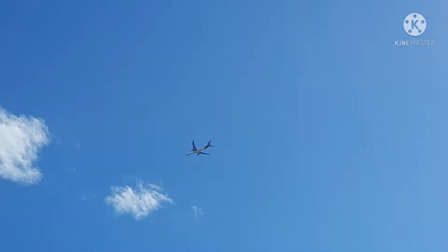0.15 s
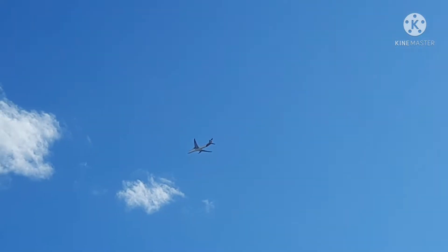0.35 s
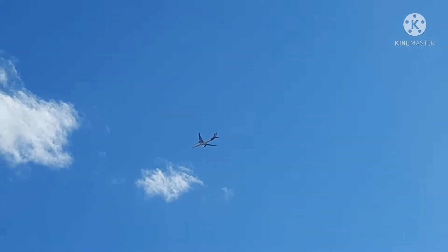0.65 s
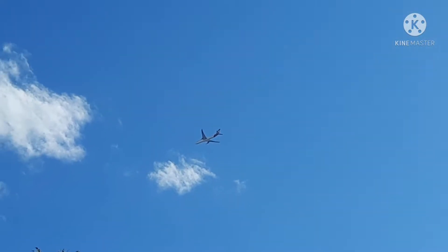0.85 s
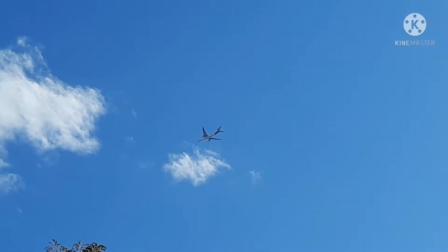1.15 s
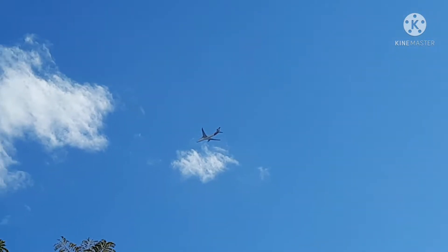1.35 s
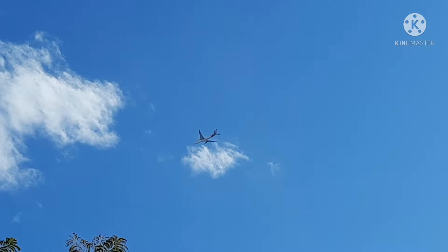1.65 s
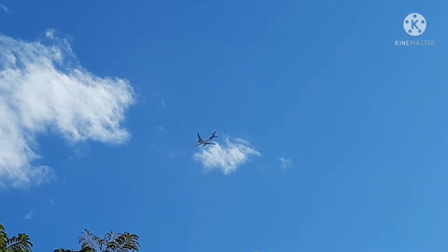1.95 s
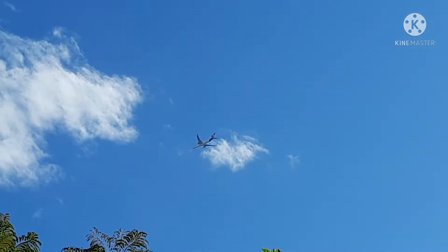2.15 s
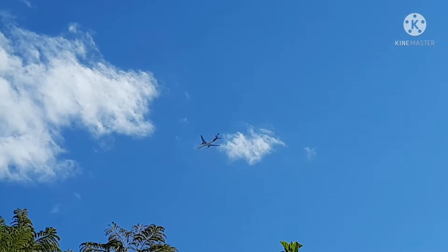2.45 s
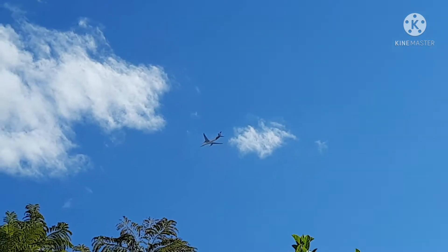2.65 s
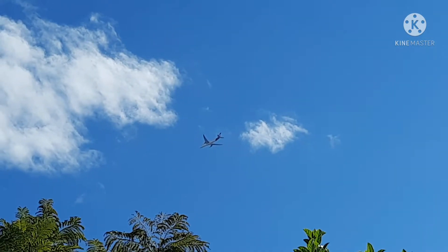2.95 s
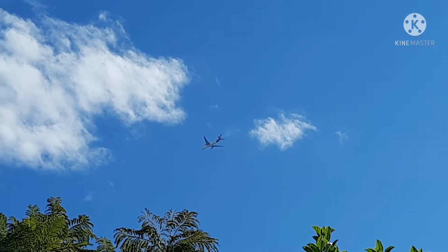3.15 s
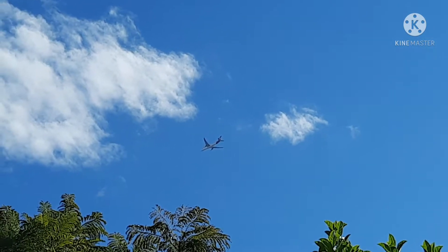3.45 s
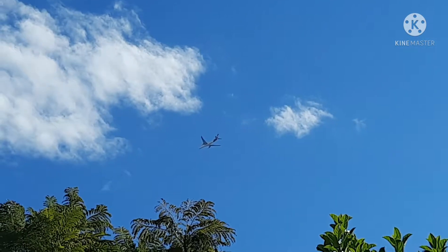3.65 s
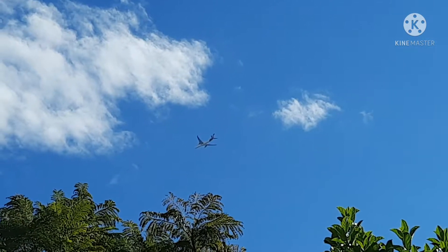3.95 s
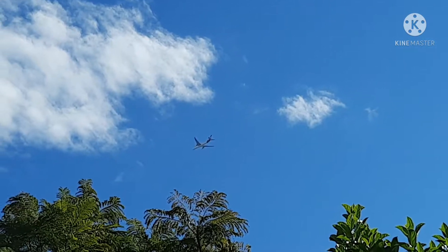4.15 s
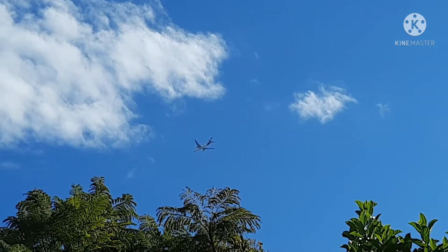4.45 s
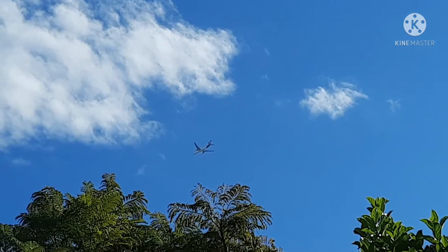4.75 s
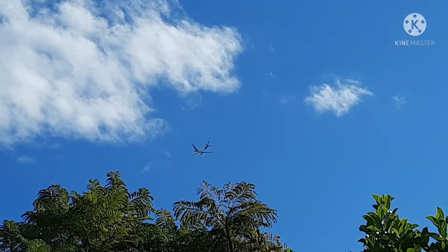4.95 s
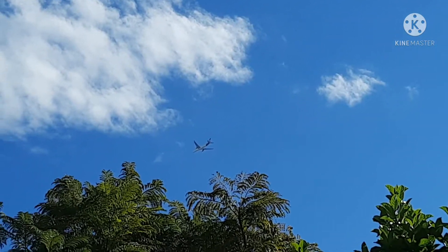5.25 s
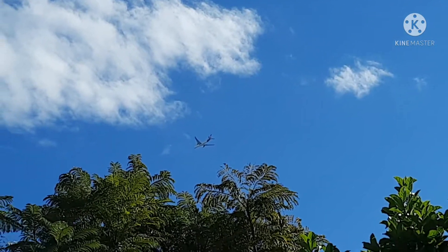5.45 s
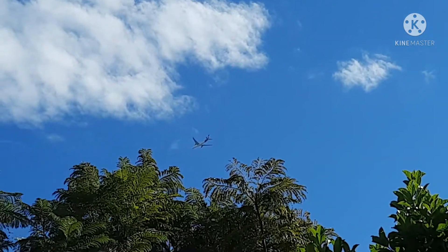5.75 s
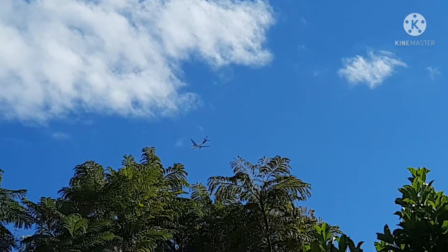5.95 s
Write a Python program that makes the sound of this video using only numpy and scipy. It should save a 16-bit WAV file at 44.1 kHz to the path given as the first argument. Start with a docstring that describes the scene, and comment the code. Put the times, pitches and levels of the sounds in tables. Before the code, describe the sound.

A jet airliner climbs away overhead with a loud, low, uneven roar and a wavering, slowly sinking whine, over barely audible bird calls.

```python
"""A jet airliner climbs away high over a garden, heard on a two-port phone. From the start its mixing exhaust roars,
dulled by the long air path, uneven and flickering in level, and echoed by ground and walls. Over it the fan whine,
a wavering tone, sinks in pitch, with a weaker drone below. From 1.5 s small birds call from the trees: a soft whistle,
two high chirps, another whistle and at 6 s a last chirp, all gliding tones smeared by the trees. Faint hiss lies below."""
import sys
import numpy as np
from scipy import signal
from scipy.fft import rfft, irfft, next_fast_len
from scipy.io import wavfile
from scipy.ndimage import uniform_filter1d

SR = 44100
rng = np.random.default_rng(int(sys.argv[2]) if len(sys.argv) > 2 else 0)


def master_out(mix):
    """Clip the mix to full scale and print it as 16-bit PCM to the path in sys.argv[1]."""
    frames = np.transpose(np.atleast_2d(mix))
    ceiling = np.clip(frames, -1, 1)
    pcm = np.round(ceiling * 32767).astype(np.int16)
    wavfile.write(sys.argv[1], SR, pcm)


N = 269539
SIZE = next_fast_len(N)  # transform length in samples


def undb(db):
    """Decibel definition: amplitude ratio = 10 ** (dB / 20)."""
    return 10 ** (np.asarray(db) / 20)


def level(x, db):
    """Root-mean-square scaling: set the effective level in dB re full scale."""
    return x * undb(db) / np.sqrt(np.mean(x ** 2))


def curve(rows):
    """Linear interpolation in time: the columns of (s, ..) rows at every sample."""
    seconds, *columns = np.transpose(rows)
    return [np.interp(np.arange(N) / SR, seconds, column) for column in columns]


def over(hz, rows):
    """Interpolation on a logarithmic frequency axis: the columns of (Hz, ..) rows at hz."""
    at, *columns = np.transpose(rows)
    return [np.interp(np.log(hz + 1), np.log(at), column) for column in columns]


def walk(rate):
    """Smoothed random process: levels held 1 / rate s, averaged twice over that time; standard deviation 1."""
    hold = int(SR / rate)
    steps = np.repeat(rng.standard_normal(900), hold)[:N]
    smooth = uniform_filter1d(uniform_filter1d(steps, hold), hold)
    return smooth / np.std(smooth)


def tone(hz):
    """Phase as the integral of frequency: a sine of effective value 1 at a changing pitch."""
    return np.sqrt(2) * np.sin(2 * np.pi * np.cumsum(hz) / SR)


def ports(hz):
    """Level and phase differences between receivers: complex gain of each port, power share both hear alike."""
    # Each row: frequency in Hz, left minus right in dB, lead of the right port in radians, likeness 0-1.
    port_rows = [(60, .1, 0, .995), (200, .4, 0, .98), (400, 1, .06, .94), (600, 2.3, .16, .92),
                 (800, 2.9, .59, .74), (1000, 1.4, .37, .61), (1150, 6.1, .6, .62), (1300, 4.2, 1.85, .76),
                 (1550, 1.9, 1.47, .82), (1850, .6, 2.11, .82), (2100, -2.8, 2.24, .6),
                 (2350, -7, 1.95, .46), (2550, -7.6, 1.12, .55), (2800, -1.1, 1.44, .37)]
    tilt_db, lead, alike = over(hz, port_rows)
    left = undb(tilt_db / 2) * np.exp(-.5j * lead)
    return np.array([left, 1 / left]), np.clip(alike, 0, 1)


def roar(hz):
    """Broadband turbulent mixing noise, comb-filtered by echoes, in third-octave bands of uneven level."""
    # Exhaust spectrum. Each row: frequency in Hz, relative density in dB per Hz.
    spectrum = [(20, -49.5), (39, -31.5), (52, -14.5), (66, -2), (130, -2.5), (330, -2.5), (480, -2),
                (740, -11.5), (830, -14.5), (1050, -20.5), (1330, -24.5), (1540, -25), (1800, -28),
                (1950, -33), (2100, -39), (2650, -55.5), (2850, -65.5), (3600, -82.5)]
    # Ground and wall echoes. Each row: delay in seconds, signed gain at the lowest frequencies.
    echo_rows = [(0.00471, -0.08), (0.00665, 0.25), (0.00774, -0.14), (0.00919, 0.06), (0.01046, -0.11),
                 (0.0123, 0.15), (0.01335, -0.14), (0.01535, 0.11), (0.01689, -0.12), (0.01812, -0.15),
                 (0.02017, 0.09), (0.02168, 0.09), (0.02543, -0.07), (0.0293, -0.07), (0.03016, 0.07)]
    # Uneven level of the roar in each range, slow swells together with the random flicker of noise.
    # Each row: time in seconds, level in dB; only departures from the mean count.
    rumble = [(0.08, -16.5), (0.88, -26.5), (1.38, -25), (1.82, -25), (2.56, -22.5), (2.84, -24),
              (3.3, -21.5), (3.56, -26), (3.8, -20.5), (4.38, -22), (4.56, -20), (4.78, -23.5),
              (5.08, -19.5), (5.52, -24), (5.76, -19.5), (6.04, -18.5)]  # 90-220 Hz
    body = [(0.08, -27.5), (.4, -28.5), (0.711, -23.5), (.95, -30.5), (1.14, -20.5), (1.36, -29),
            (1.7, -27), (2.4, -30.5), (2.75, -25), (2.95, -20.5), (3.151, -27), (3.3, -23), (3.65, -31),
            (3.85, -28.5), (4.4, -29.5), (4.6, -24.5), (5.0, -28), (5.15, -24.5), (5.6, -27), (6.04, -24.5)]  # 220-290 Hz
    low = [(0.05, -16.5), (0.15, -25), (0.2, -24.5), (0.28, -18.5), (0.42, -27), (0.47, -18.5), (1.17, -26),
           (1.62, -27), (1.64, -19), (1.86, -23.5), (1.89, -17.5), (2.13, -23), (2.23, -22), (2.26, -30.5),
           (2.41, -17.5), (2.45, -26.5), (2.77, -21), (2.82, -25.5), (2.88, -17.5), (3.0, -24.5),
           (3.35, -18), (3.5, -29), (3.52, -20.5), (3.62, -22), (4.16, -17.5), (4.17, -21), (4.69, -22.5),
           (4.71, -16), (4.74, -26), (5.21, -25.5), (5.25, -16.5), (5.28, -23.5), (5.77, -26), (5.8, -19.5),
           (6.04, -25), (6.07, -22.5)]  # 290-420 Hz
    middle = [(0.05, -27.5), (0.38, -20.5), (0.47, -23), (0.5, -18.5), (0.57, -15.5), (0.6, -23.5),
              (0.64, -16.5), (0.77, -27.5), (1.22, -26.5), (1.24, -22), (1.46, -27.5), (1.47, -22.5),
              (1.54, -28.5), (1.64, -21), (2.26, -24.5), (2.88, -21), (2.93, -23.5), (3.1, -24),
              (3.15, -18), (3.22, -25), (3.25, -17.5), (3.45, -25.5), (3.97, -20), (4.06, -18),
              (4.17, -23.5), (4.19, -18.5), (4.32, -20), (4.34, -25.5), (4.39, -17), (4.43, -29.5),
              (4.46, -21.5), (4.71, -19), (4.76, -27), (5.25, -16), (6.02, -26.5), (6.07, -21.5)]  # 400-540 Hz
    upper = [(0.05, -23.5), (0.12, -28), (0.38, -26.5), (0.53, -21), (1.14, -31), (1.17, -27.5),
             (1.41, -32.5), (1.66, -22), (1.98, -26.5), (2.01, -31), (2.2, -23), (2.33, -29), (2.72, -24),
             (2.75, -17.5), (2.78, -23.5), (2.88, -17), (2.92, -24.5), (3.32, -20), (3.54, -30),
             (3.85, -25.5), (3.94, -21), (3.99, -28.5), (4.07, -23), (4.11, -28.5), (4.53, -24),
             (5.11, -29.5), (5.16, -25), (5.4, -26), (5.42, -24), (5.78, -31), (5.94, -26.5), (6.07, -30)]  # 540-850 Hz
    treble = [(0.08, -32), (0.26, -34.5), (0.56, -31), (1.2, -37.5), (1.34, -34), (1.44, -39),
              (1.76, -28.5), (2.32, -38.5), (2.64, -34), (2.78, -33.5), (3.06, -34), (3.24, -27),
              (3.359, -30), (3.481, -37), (3.639, -37), (3.721, -39.5), (3.839, -35), (4.0, -35),
              (4.2, -36.5), (4.54, -32), (4.9, -37.5), (5.06, -36), (5.16, -34.5), (5.26, -34.5),
              (5.42, -30), (5.6, -31.5), (5.88, -38.5), (6.04, -34.5)]  # 800-1600 Hz
    edge = [(0.08, -63.5), (0.341, -60.5), (0.5, -58.5), (1.24, -65.5), (1.501, -64.5), (1.74, -60),
            (1.86, -57.5), (2.0, -65.5), (2.18, -60), (2.399, -67), (2.48, -65.5), (2.66, -58.5),
            (2.94, -62.5), (3.1, -65), (3.2, -57), (3.26, -53.5), (3.46, -67.5), (3.6, -66), (3.7, -66.5),
            (3.8, -63), (4.101, -63.5), (4.3, -60.5), (4.44, -67), (4.66, -61.5), (4.9, -65.5), (5.08, -66),
            (5.359, -60.5), (5.48, -58.5), (5.94, -66.5), (6.04, -63.5)]  # above 2 kHz
    # How far each band follows them. Each row: frequency in Hz, then the share of the rumble, body, low,
    # middle, upper, treble and edge level (no unit).
    follows = [(71.6, 0, 0.021, 0.037, 0.1, 0, 0, 0.0098), (132, 0.33, 0.13, 0.32, 0.03, 0, 0.25, 0),
               (195, 0.96, 0, 0, 0, 0, 0, 0), (254, 0, 0.5, 0.027, 0, 0.067, 0.14, 0.029),
               (335, 0.07, 0, 0.53, 0, 0.0059, 0, 0.39), (414, 0.14, 0, 0.2, 0.4, 0.065, 0.07, 0),
               (503, 0, 0, 0, .7, 0.32, 0.031, 0.071), (640, 0.032, 0, 0.065, 0.02, .9, 0, 0.045),
               (800, 0.059, 0.12, 0.032, 0, 0.53, 0.58, 0), (1000, 0, 0.027, 0, 0, 0.013, 1.2, 0),
               (1530, 0.31, 0, 0, 0.02, 0, 1.7, 0.064), (2030, 0.059, 0, 0, 0, 0, .3, 1),
               (2560, 0, 0.048, 0, 0, 0, 0.06, 1.5), (3200, 0, 0.014, 0, 0, 0.017, 0, 1.2)]
    roar_db, echo_dull_hz = -16, 1200
    # further random level of each band on its own: spread in dB, steps per second
    fast_db, fast_rate = 0.7, 6.5
    slow_db, slow_rate = 1.41, 2.6

    gain, alike = ports(hz)
    direct, *scattered = rfft(rng.standard_normal((3, SIZE)))
    noise = np.sqrt(alike) * direct + np.sqrt(1 - alike) * np.array(scattered)
    reflections = sum(g * np.exp(-2j * np.pi * hz * s) for s, g in echo_rows)
    echoed = 1 + np.exp(-hz / echo_dull_hz) * reflections
    sound = noise * gain * echoed * undb(over(hz, spectrum)[0])

    levels_db = [curve(rows)[0] for rows in (rumble, body, low, middle, upper, treble, edge)]
    uneven_db = np.array([db - db.mean() for db in levels_db])
    out = 0
    step = np.log2(np.maximum(hz, 20) / 20) * 3  # third octaves above 20 Hz
    for k in range(24):
        band = np.cos(np.pi / 2 * np.clip(step - k, -1, 1)) ** 2  # neighbours overlap and sum to 1
        share = np.array(over(20 * 2 ** (k / 3), follows))
        chance_db = fast_db * walk(fast_rate) + slow_db * walk(slow_rate)
        out = out + irfft(sound * band, SIZE)[:, :N] * undb(share @ uneven_db + chance_db)
    return level(out, roar_db)


def whine(hz):
    """Doppler effect: two engine lines sink in pitch as the aircraft draws away; both waver at random."""
    # Fan whine. Each row: time in seconds, mean level in dB before the port gains.
    fan_rows = [(0.03, -48), (.25, -47.5), (.52, -42), (.6, -43), (0.68, -39.5), (.78, -42), (0.85, -59.5),
                (1.05, -48.5), (1.22, -56.5), (1.29, -38), (1.38, -57), (1.48, -42.5), (1.54, -57),
                (1.6, -38.5), (1.69, -43.5), (1.76, -29.5), (1.86, -37.5), (1.92, -34.5), (2.02, -37.5),
                (2.12, -34), (2.26, -41), (2.32, -42.5), (2.37, -38.5), (2.52, -34), (2.62, -35.5),
                (2.68, -42.5), (2.75, -39), (2.91, -48.5), (2.98, -36), (3.06, -42.5), (3.16, -44),
                (3.21, -27.5), (3.3, -25.5), (3.35, -45), (3.39, -46), (3.46, -49), (3.56, -42),
                (3.62, -55.5), (3.67, -45), (3.75, -38.5), (3.79, -47.5), (3.91, -47.5), (3.96, -40.5),
                (4.06, -36), (4.18, -37.5), (4.26, -38.5), (4.4, -34.5), (4.5, -45), (4.62, -43),
                (4.85, -46), (5.1, -46), (5.19, -50), (5.25, -44.5), (5.34, -38.5), (5.4, -43), (5.5, -36),
                (5.6, -38.5), (5.68, -40), (5.8, -45), (5.89, -54), (5.95, -35.5), (6.03, -39), (6.09, -48)]
    # Fan pitch. Each row: time in seconds, mean frequency in Hz.
    fan_pitch = [(0, 1741), (2, 1702.5), (2.8, 1687.5), (4, 1670), (4.5, 1659.5), (6.11, 1633.5)]
    # Weaker, lower engine tone. Each row: time in seconds, mean level in dB before the port gains.
    drone_rows = [(0, -60), (.7, -53), (1.3, -60), (1.93, -54), (2.03, -48), (2.13, -40), (2.2, -55),
                  (2.36, -57), (2.41, -44), (2.55, -48), (2.74, -50), (2.82, -36), (2.87, -39), (2.92, -51),
                  (3.02, -43), (3.12, -52), (3.3, -49), (3.5, -58), (6.11, -58)]
    # spread of the random pitch in Hz and level in dB
    fan_waver_hz, fan_twinkle_db = 2.4, 1.4
    drone_waver_hz, drone_twinkle_db = 5, 2.5
    drone_hz, drone_sink = 1115, 6  # starting pitch in Hz, fall in Hz per second

    fan_db = curve(fan_rows)[0] + fan_twinkle_db * walk(30)
    fan = tone(curve(fan_pitch)[0] + fan_waver_hz * walk(40)) * undb(fan_db)
    pitch = drone_hz - drone_sink * np.arange(N) / SR
    drone_db = curve(drone_rows)[0] + drone_twinkle_db * walk(22)
    drone = tone(pitch + drone_waver_hz * walk(25)) * undb(drone_db)
    gain, _ = ports(hz)
    return irfft(rfft(fan + drone, SIZE) * gain, SIZE)[:, :N]


def chirp_calls(t):
    """Frequency modulation: high calls dip, hold and lift again, flicking upward in pitch at random."""
    # Each row: start in seconds, level in dB, time held at the bottom in seconds.
    calls = [(1.93, -76, 0.035), (4.385, -77, 0.1), (6.06, -80, 0.038)]
    # Fall of a call. Each row: time from the start in seconds, pitch before the flicks in Hz, relative level in dB.
    fall = [(0, 7300, -30), (.005, 7250, -14), (.013, 7050, -7), (.019, 6700, 0), (.027, 6400, 0),
            (.045, 6340, -3)]
    # Lift of a call. Each row: time from the end of the hold in seconds, then pitch and level as in the fall.
    rise = [(0, 6330, -11), (.01, 6600, -13), (.022, 7050, -17), (.036, 7600, -22), (.046, 7900, -45)]
    warble = 130 * walk(140) ** 2  # Hz; the square is never negative
    chirps = 0
    for start, db, hold in calls:
        lift = np.add(rise, (fall[-1][0] + hold, 0, 0))
        at, pitch, shape_db = np.vstack([fall, lift]).T
        shape = undb(db + np.interp(t - start, at, shape_db))
        chirps = chirps + tone(np.interp(t - start, at, pitch) + warble) * shape * (t > start)
    return chirps


def whistle_calls(t):
    """Amplitude modulation: low, soft gliding whistles flutter in level."""
    # One list for each whistle. Each row: time in seconds, pitch in Hz, mean level in dB.
    glides = [
        [(1.525, 2760, -95), (1.545, 2720, -77), (1.6, 2500, -72), (1.68, 2330, -76), (1.76, 2150, -77),
         (1.8, 2110, -90)],
        [(4.872, 3170, -90), (4.893, 3110, -73), (4.908, 2980, -75), (4.922, 2680, -75), (4.95, 2690, -73),
         (5.0, 2750, -77), (5.06, 2750, -81), (5.09, 2730, -92)],
    ]
    flutter_db = 4 * walk(60)
    whistles = 0
    for rows in glides:
        pitch, db = curve(rows)
        sounding = (t > rows[0][0]) * (t < rows[-1][0])
        whistles = whistles + tone(pitch) * undb(db + flutter_db) * sounding
    return whistles


def birds():
    """Reflection and diffuse scattering: walls repeat the chirps; the trees smear chirps and whistles."""
    # Wall repeats of the chirps. Each row: delay in seconds, level in dB relative to the chirp.
    wall_rows = [(0.022, 2), (.03, 4), (0.047, 2.5), (.064, 2)]
    trees_t60_s, trees_rise_s = .34, .02
    trees_db = 19  # energy of the tail relative to a unit impulse
    whistle_wet = .15  # share of the whistles that the trees smear
    pan_db = -6.5  # left minus right

    t = np.arange(N) / SR
    chirps, whistles = chirp_calls(t), whistle_calls(t)
    repeats = sum(undb(db) * np.pad(chirps, (int(s * SR), 0))[:N] for s, db in wall_rows)
    unsmeared = whistles + chirps + repeats
    age = t[:SR // 2]
    envelope = undb(-60 * age / trees_t60_s) * np.minimum(age / trees_rise_s, 1)
    tail = rng.standard_normal((2, SR // 2)) * envelope
    tail *= undb(trees_db) / np.sqrt(np.sum(tail ** 2, axis=1, keepdims=True))
    smeared = signal.fftconvolve((whistle_wet * whistles + chirps)[None], tail, axes=1)[:, :N]
    return (unsmeared + smeared) * undb(np.array([[pan_db], [-pan_db]]) / 2)


def scene():
    """Superposition: the pressures of aircraft and birds add."""
    hz = np.fft.rfftfreq(SIZE, 1 / SR)
    return roar(hz) + whine(hz) + birds()


def record(dry):
    """Self-noise and band limit: the phone adds a faint unrelated hiss to each port and cuts the top."""
    # Hiss spectrum. Each row: frequency in Hz, relative density in dB per Hz.
    hiss_rows = [(1500, -6.5), (3000, 5), (4100, 3), (5500, 1), (8300, 1.5), (9700, -3), (11000, 0.5),
                 (15000, 0.5)]
    hiss_db, top_hz = -69, 15480
    hz = np.fft.rfftfreq(SIZE, 1 / SR)
    noise = rfft(rng.standard_normal((2, SIZE)))
    hiss = irfft(noise * undb(over(hz, hiss_rows)[0]), SIZE)[:, :N]
    low_pass = signal.ellip(10, .2, 70, top_hz, fs=SR, output="sos")
    return signal.sosfilt(low_pass, dry + level(hiss, hiss_db))


dry = scene()
out = record(dry)
master_out(out)
```